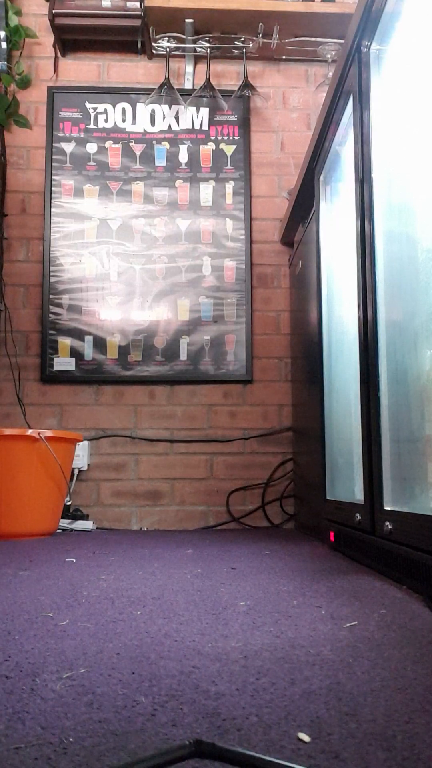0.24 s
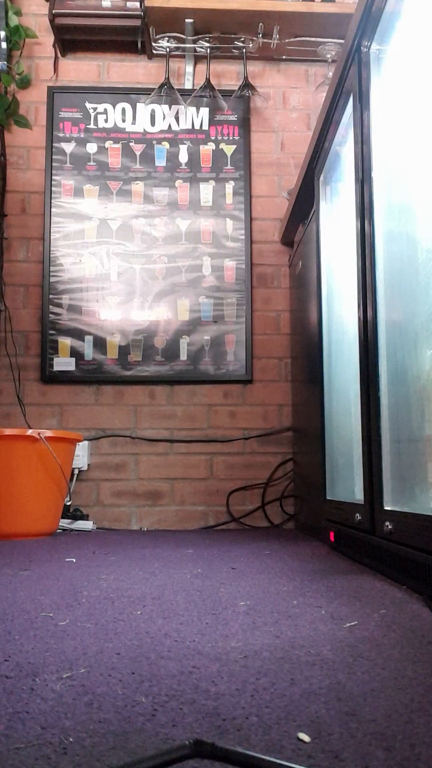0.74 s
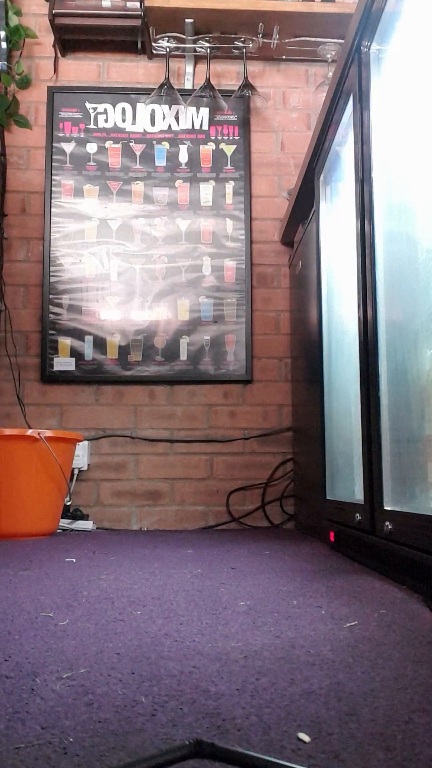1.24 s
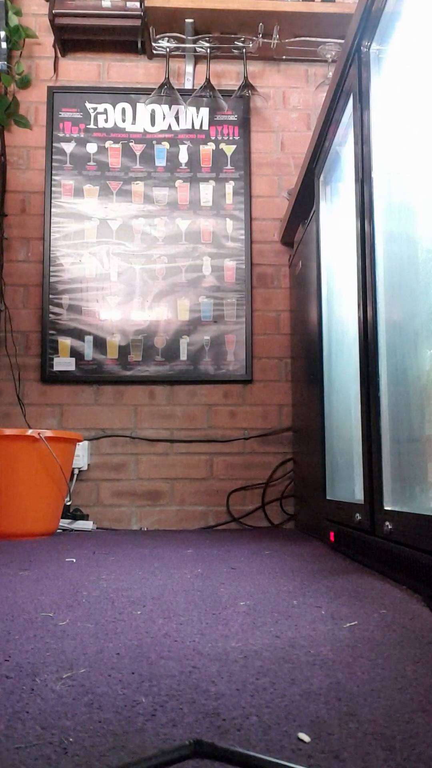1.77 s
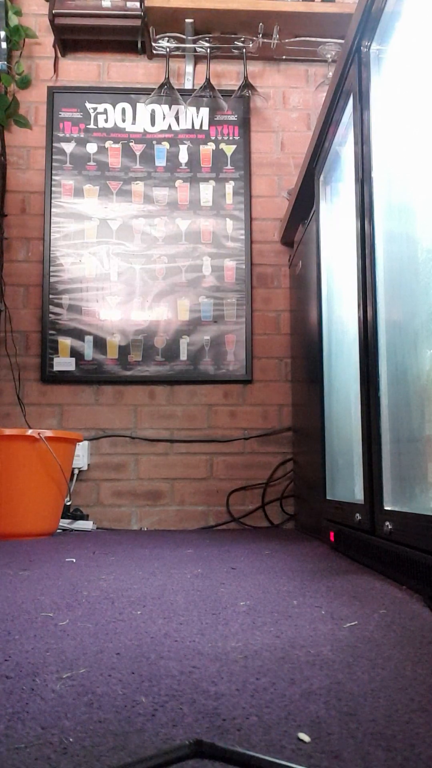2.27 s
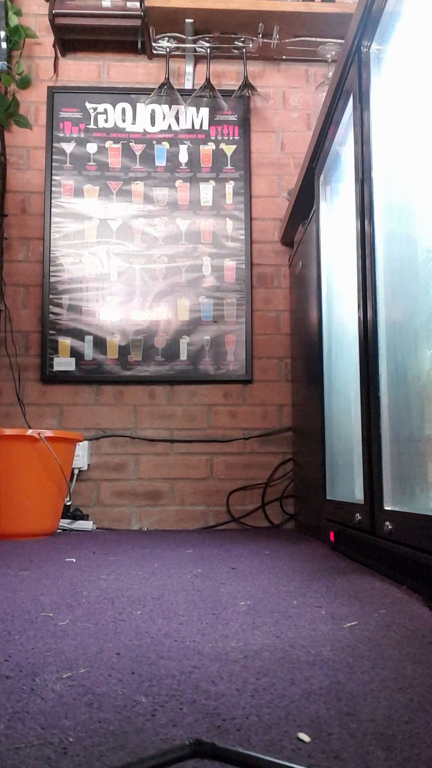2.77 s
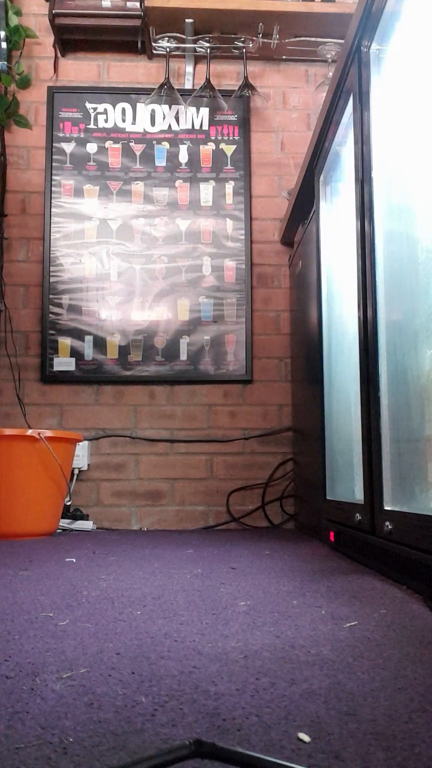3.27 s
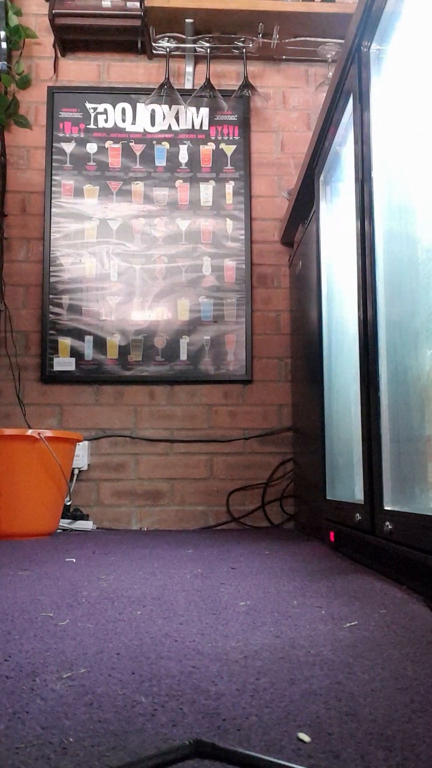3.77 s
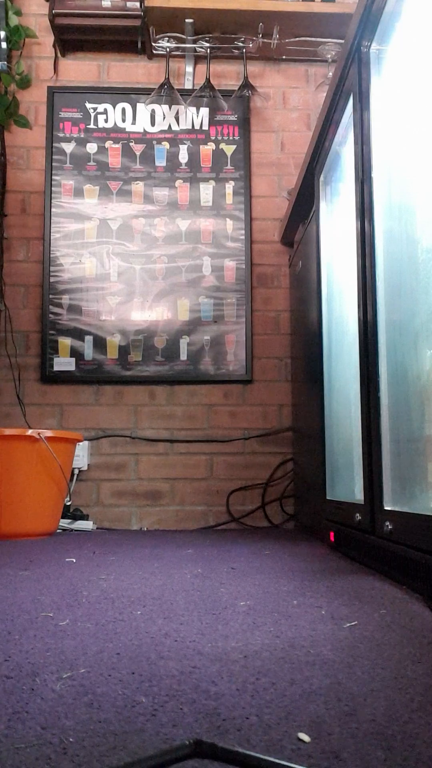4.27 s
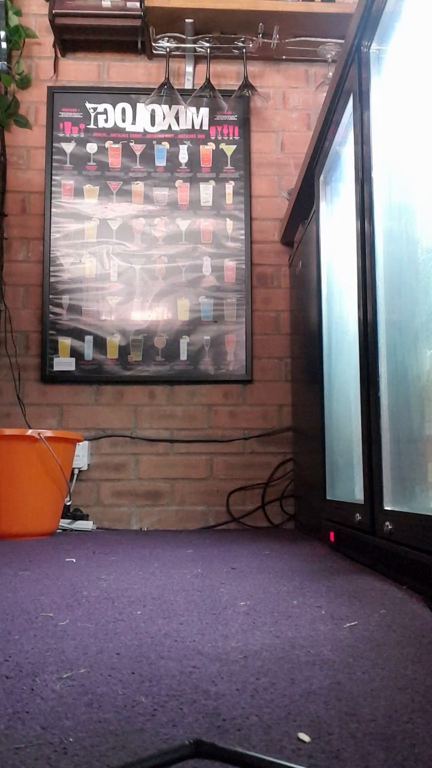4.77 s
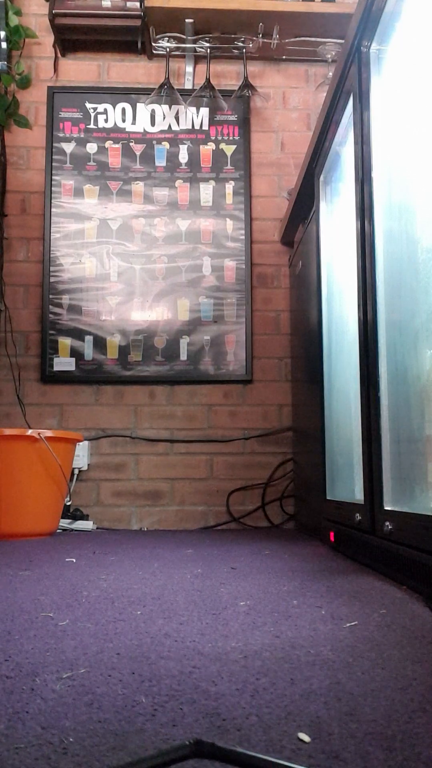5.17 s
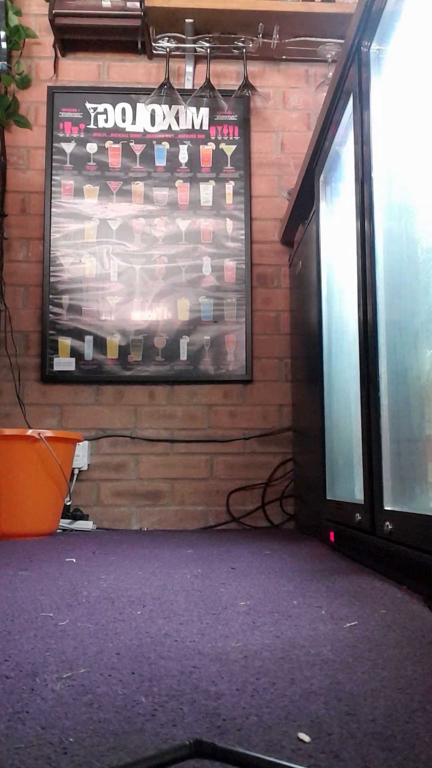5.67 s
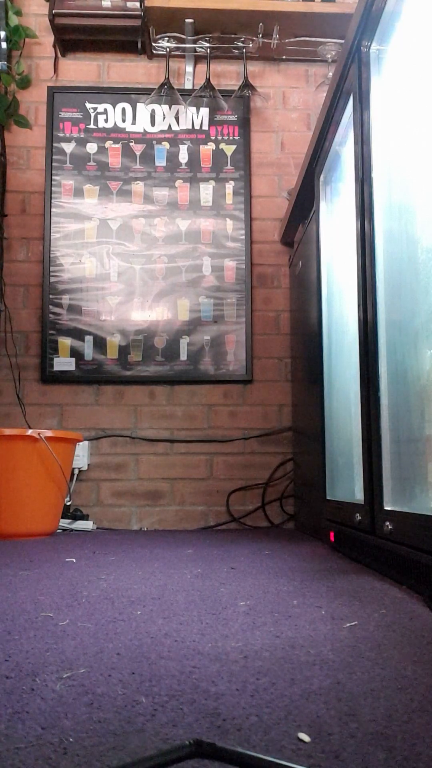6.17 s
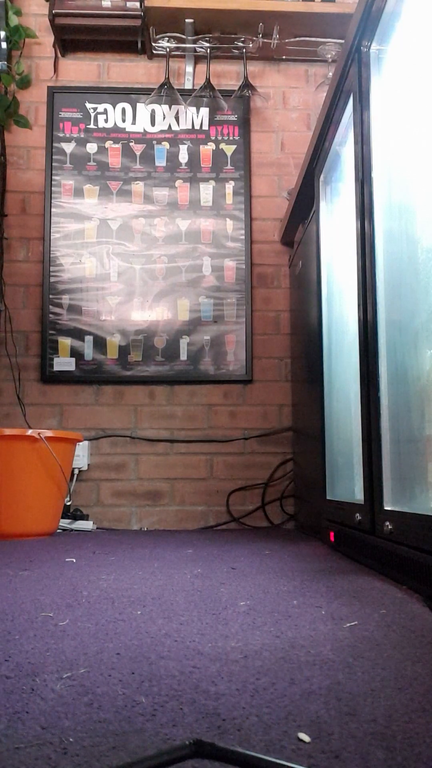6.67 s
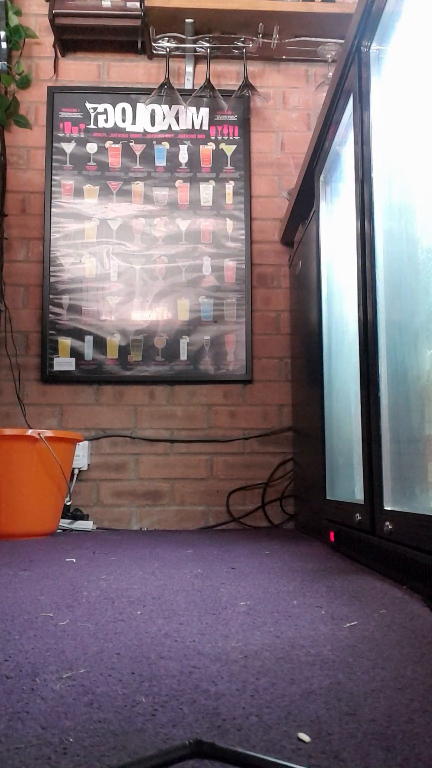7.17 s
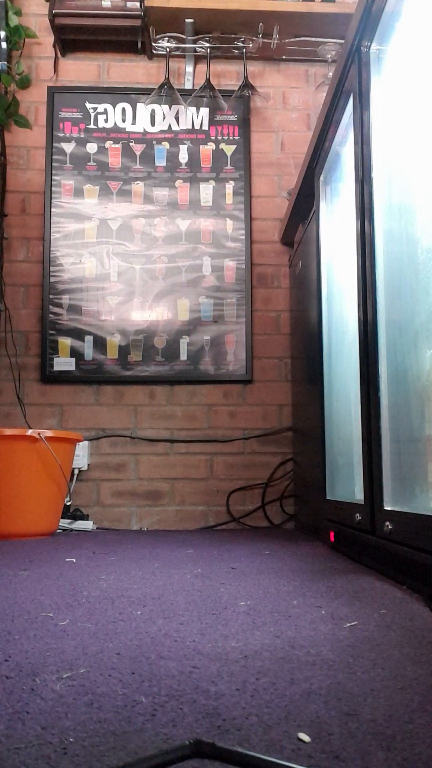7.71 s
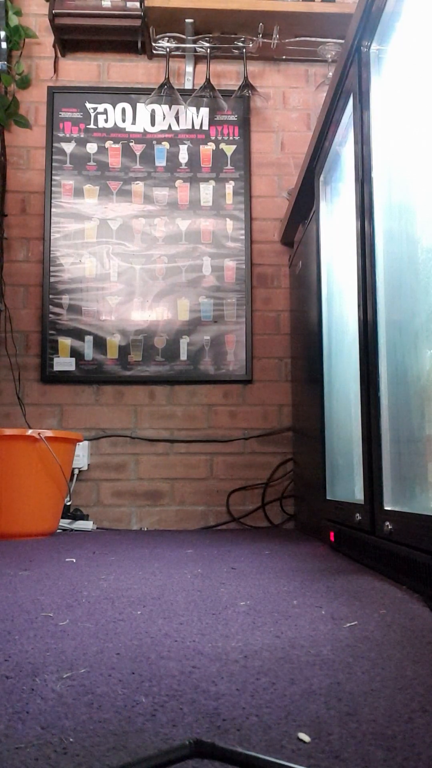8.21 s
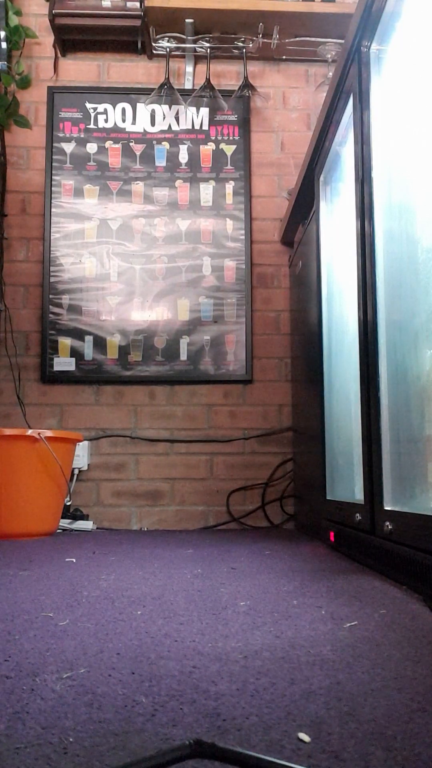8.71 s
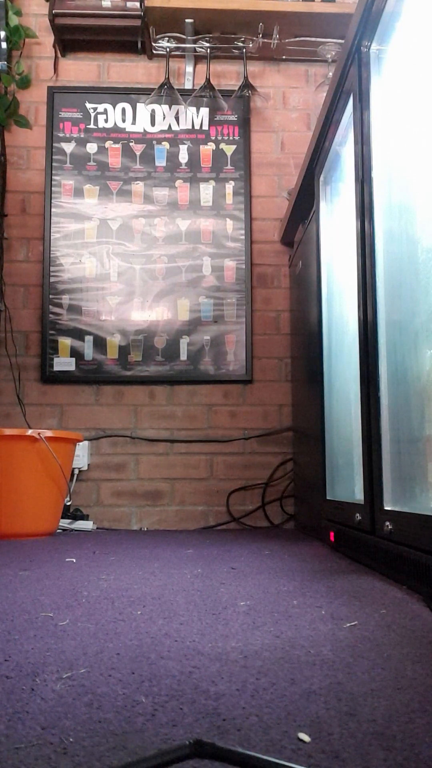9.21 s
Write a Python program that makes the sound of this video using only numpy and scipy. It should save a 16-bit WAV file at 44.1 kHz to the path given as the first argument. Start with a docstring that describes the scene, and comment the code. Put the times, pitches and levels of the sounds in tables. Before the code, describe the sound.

Close stereo phone pickup on a counter beside a running fridge in a small brick-walled bar corner. The constant drone and airy fan carry a light, sputtering hiss. Someone moves about with soft, dull steps and faint cloth rustles. A door then rattles and bangs in several short wooden knocks with metallic latch clicks, shaking the counter with low thumps. Afterwards the fridge continues with occasional muted footfalls.

```python
"""A small bar corner, heard at the two microphone ports of a phone on the counter beside a drinks fridge.
Throughout: motor drone and whine from tones on one shaft, fan air and coolant hiss from shaped noise.
From 0.15 s soft footfalls boom in the floor, and clothes brush in noise swells until about 3.4 s.
From 1.1 s a latch ticks in ringing modes; from 3.3 to 4.9 s a door knocks as rubbing, clicking bursts.
From 4.1 s jolts ring the counter modes; footfalls go on to 8.8 s."""
import sys
import numpy as np
from scipy import signal
from scipy.fft import rfft, irfft
from scipy.io import wavfile
from scipy.ndimage import uniform_filter1d

SR = 44100
rng = np.random.default_rng(int(sys.argv[2]) if len(sys.argv) > 2 else 0)


def inscribe(sig):
    """Save sig as 16-bit PCM at rate SR to the path in sys.argv[1].

    A 1-D sig is mono; a 2-D sig holds one channel per row.
    Samples are clipped to [-1, 1] before scaling.
    """
    pcm = np.round(np.clip(np.atleast_2d(sig).T, -1, 1) * 32767)
    wavfile.write(sys.argv[1], SR, pcm.astype(np.int16))


N = 416744
T = np.arange(N) / SR
HZ = np.maximum(np.arange(N // 2 + 1) * SR / N, 1)

BLADE_HZ, SLOT_HZ, MAINS_HZ = 191.95, 652.7, 50
# motor drone: (multiple of the blade rate, level [dB])
DRONE_PARTIALS = [(1, -55.5), (2, -83), (3, -80), (4, -88), (5, -88.5)]
# rotor-slot whine and magnetic sidebands: (offset [twice the mains rate], level [dB])
WHINE_SIDEBANDS = [(-1, -70.5), (0, -65.5), (1, -70), (2, -91)]
# mains buzz: (multiple of the mains rate, level [dB])
BUZZ_PARTIALS = [(4, -75.5), (6, -76.5)]
# fan air: (frequency [Hz], density [dB per Hz])
AIR_DENSITY = [(20, -110), (38, -93.5), (100, -89.5), (180, -85.5), (230, -91.5), (340, -94.5), (450, -103),
               (620, -94), (760, -99), (950, -104), (1130, -116), (1700, -123), (4000, -135)]
# cabinet resonances stirred by the air: (frequency [Hz], width [Hz], density [dB per Hz])
CABINET_MODES = [(64.5, 4.02, -85.5), (136, 4.7, -72), (373.3, 6.3, -91), (1262, 50, -114)]
# coolant hiss before its flow gain: (frequency [Hz], density [dB per Hz])
HISS_DENSITY = [(1500, -135), (2400, -114), (3400, -117), (5000, -125), (6800, -125), (7800, -138),
                (11000, -126), (15000, -135)]
# pipe resonances before the flow gain: (frequency [Hz], width [Hz], density [dB per Hz])
PIPE_MODES = [(2240, 190, -110), (6140, 213, -123)]
# coolant flow: (time [s], gain [dB])
FLOW_GAIN = [(0, 3.5), (1.5, 1), (3.2, 3), (5, -1), (6, -2), (6.6, 1.5), (7.3, -0.5), (9.4, -0.5)]
# soft footfalls: (time [s], relative level [dB])
FOOTFALLS = [(0.152, -43), (0.491, -55.5), (1.06, -58), (1.85, -54.5), (2.205, -46.5), (3.405, -45),
             (4.842, -41.5), (4.939, -52), (5.46, -43), (6.781, -60), (7.728, -55), (8.78, -58)]
# floor boom: (frequency [Hz], relative gain [dB])
FLOOR_COLOUR = [(20, -28), (42, -9.5), (65, 5), (82, 1.5), (110, -3.5), (170, -15.5), (300, -23.5),
                (700, -73)]
STEP_T60_S = 0.6
# cloth swells: (time [s], level before cloth colour [dB per Hz], half length [s])
CLOTH_SWELLS = [(0.163, -119, .1), (0.538, -116, 0.09), (1.29, -116, 0.13), (1.92, -115, 0.098),
                (3.3, -108, 0.065)]
# cloth colour: (frequency [Hz], gain [dB])
CLOTH_COLOUR = [(500, -4), (1100, 6), (2500, 2), (4000, -6), (6300, 6), (7600, -3), (8500, -37), (11000, 0),
                (15000, -18)]
# latch ticks: (time [s], relative bright ring [dB], relative dull ring [dB], chatter decay [s])
LATCH_TICKS = [(1.127, -50, -58, .003), (1.137, -43, -55, .003), (3.427, -29, -42.5, .01),
               (3.964, -50.5, -61, 0.0016), (3.974, -47, -60, .001), (4.566, -55, -33.5, .025)]
# modes of the latch metal: (frequency [Hz], width [Hz], gain [dB])
DULL_METAL_MODES = [(1950, 900, 0), (2674, 560, 1.5), (3770, 900, -8.5)]
BRIGHT_METAL_MODES = [(5400, 262, -2), (6060, 460, -0.5), (10800, 2700, -15.5)]
# door contacts: (time [s], relative level [dB], rub rise before [s], chatter decay after [s],
# hardness [steps]: 0 firm, below 0 soft)
DOOR_CONTACTS = [(3.315, -39.5, 0.01, 0.05, -0.15), (3.387, -33.5, .002, .024, 0.28),
                 (3.427, -35.5, .004, .012, .3), (3.969, -60.5, 0.00089, .008, -2.6),
                 (4.128, -49.5, 0.0017, 0.018, -0.13), (4.150, -39.5, .004, 0.032, 0),
                 (4.205, -28, .02, .008, -0.7), (4.220, -29, 0.0073, .012, 1), (4.369, -39, .002, 0.026, 0),
                 (4.503, -45, .002, 0.011, -1), (4.522, -41, .004, .04, -1.1),
                 (4.651, -25.5, 0.015, 0.021, 0.1349), (4.86, -61.5, .02, 0.075, -2.5)]
# broad door colour: (frequency [Hz], gain [dB])
DOOR_COLOUR = [(60, -2), (150, 5.5), (330, -0.5), (650, 1), (1300, 4.5), (1950, 2.5), (2400, -2),
               (4000, -3), (6200, -1.5), (7300, -6.5), (8300, -18.5), (11000, -14.5), (13000, -20.5),
               (15500, -35)]
# panel modes once the door sits in its frame: (frequency [Hz], width [Hz], gain [dB])
FRAMED_DOOR_MODES = [(922, 40, 2.5), (1330, 37, -10.5), (1810, 62, 0), (1910, 99, -4.5)]
# effect of one step of hardness: (frequency [Hz], gain [dB])
HARDNESS_COLOUR = [(200, -4.5), (900, -3.5), (2500, 2.5), (7000, 0.5), (10000, 14.5)]
SHUT_S = 4.615
# jolts to the counter: (time [s], level [dB], contact time [s], first rebound against the jolt [dB])
COUNTER_JOLTS = [(4.129, -36.5, 0.0044, -5), (4.202, -25, 0.0019, -19.5), (4.216, -19, 0.0034, 4),
                 (4.699, -37.5, 0.0022, -7)]
# counter modes: (frequency [Hz], gain [dB], t60 [s])
COUNTER_MODES = [(42.3, -6.5, 0.42), (65.2, -8.5, 0.52), (84.9, -6, 0.31), (104, -12.5, 0.25),
                 (114.9, -1.5, 0.39), (138.8, -8, 0.262), (164.6, -2, 0.48), (206, -9.5, .17),
                 (251, -12, 0.21)]
# rocking: first gap, growth ratio of the gaps, loss per rebound, contact time of a rebound
ROCK_GAP_S, ROCK_GROWTH, ROCK_LOSS_DB, ROCK_CONTACT_S = .0283, 1.62, 7.5, .0096
# reverberation: (frequency [Hz], t60 [s])
ROOM_T60 = [(150, 0.82), (700, 0.37), (2000, 0.32), (6000, 0.31), (12000, .27)]
# right port, facing away: (frequency [Hz], gain against the left port [dB])
RIGHT_SHADE = [(50, -1.5), (200, 0.74), (400, 0.5), (650, 4.5), (900, 4), (1500, -3), (2500, -11),
               (4200, -15), (6000, -28), (8300, -43), (10000, -26), (12000, -19.5), (15000, -5.5)]
# lag of sound bending round the phone to the right port: (frequency [Hz], phase [rad])
RIGHT_LAG = [(100, 0.054), (200, 0.17), (400, 0.16), (650, 0.69), (900, 1.58), (1150, 3.25), (1500, 3.08),
             (2000, 4)]
# microphone hiss: (frequency [Hz], density [dB per Hz])
MIC_HISS = [(100, -110), (1400, -117), (2200, -119), (3700, -120), (5500, -125), (7300, -131), (8700, -132),
            (10200, -127), (11500, -120), (15500, -119)]
TOP_HZ = 15600


def undb(db):
    """Decibels to gain."""
    return 10 ** (np.asarray(db) / 20)


def contour(points, hz=HZ):
    """Join (frequency [Hz], value) points on a log-frequency axis."""
    at_hz, value = np.transpose(points)
    return np.interp(np.log(hz), np.log(at_hz), value)


def resonances(modes):
    """Summed response of (frequency [Hz], width [Hz], gain [dB]) resonances."""
    return sum(undb(db) / (1 + 1j * (HZ ** 2 - hz ** 2) / (HZ * width_hz)) for hz, width_hz, db in modes)


def white():
    """Spectrum of white noise at 0 dB per Hz."""
    return rfft(rng.standard_normal(N)) * np.sqrt(SR / 2)


def diffuse(spacing_m=0.11):
    """Spectra of room noise at two close ports: alike in the bass, unrelated in the treble."""
    alike = np.sinc(2 * HZ * spacing_m / 343)  # 343 m/s: speed of sound
    left = white()
    right = alike * left + np.sqrt(1 - alike ** 2) * white()
    return np.array([left, right])


def walk(rate):
    """Smooth random wander with unit spread; a higher rate wanders faster."""
    x = irfft(white() * np.exp(-(HZ / (1 + rate)) ** 2), N)
    return (x - x.mean()) / x.std()


def even(x, span_hz=170):
    """Level a burst's spectrum by its local power, giving it about unit energy."""
    spectrum = rfft(x)
    size = 2 * int(span_hz * len(x) / SR / 2) + 1
    power = uniform_filter1d(abs(spectrum) ** 2, size)
    return irfft(spectrum / np.sqrt(power), len(x))


def tint(x, gain):
    """Colour a short sound by a gain over frequency, without shifting it in time."""
    size = x.shape[-1]
    return irfft(rfft(x) * np.interp(np.fft.rfftfreq(size, 1 / SR), HZ, gain), size)


def add(out, s, x):
    """Mix a short sound in from time s."""
    i = int(s * SR)
    out[..., i:i + x.shape[-1]] += x


def echoes(count, direct_db=-15, early_db=-3, early_s=0.039):
    """Room echoes from several spots: direct click, early boost, tail dying sooner in the treble."""
    field, t = diffuse(spacing_m=0.067), T[:SR]
    bands = []
    for band in range(len(ROOM_T60)):
        share = contour([(hz, k == band) for k, (hz, _) in enumerate(ROOM_T60)])
        bands.append(irfft(field * share, N))
    for start in rng.integers(0, N - SR, count):
        tail = sum(noise[:, start:start + SR] * np.exp(-np.log(1000) * t / t60_s)
                   for noise, (_, t60_s) in zip(bands, ROOM_T60))
        tail = tail * (1 + undb(early_db) * np.exp(-t / early_s))
        yield tail / np.sqrt(np.sum(tail[0] ** 2)) + undb(direct_db) * (t == 0)


def press(contact_s):
    """A smooth push of unit area; a longer one is duller."""
    push = np.sin(np.pi * np.minimum(T[:SR // 20] / contact_s, 1)) ** 2
    return push / push.sum()


def motor(wander=0.0011, waver_db=0.78):
    """Blade drone and slot whine share one shaft speed; mains sidebands make the whine throb."""
    turn = 2 * np.pi * np.cumsum(1 + wander * walk(0.35)) / SR
    mains = 2 * np.pi * MAINS_HZ * T
    drone = sum(undb(db) * np.cos(round(k) * BLADE_HZ * turn + rng.uniform(0, 2 * np.pi))
                for k, db in DRONE_PARTIALS)
    whine = sum(undb(db) * np.cos(SLOT_HZ * turn + 2 * round(k) * mains) for k, db in WHINE_SIDEBANDS)
    buzz = sum(undb(db) * np.cos(round(k) * mains) for k, db in BUZZ_PARTIALS)
    drone = drone * undb(waver_db * walk(2.8))
    whine = whine * undb(waver_db * walk(3))
    return np.sqrt(2) * (drone + whine + buzz)  # levels are RMS


def fan(flutter_db=0.04):
    """Air rushes through the grille and stirs the cabinet panels."""
    colour = np.hypot(undb(contour(AIR_DENSITY)), abs(resonances(CABINET_MODES)))
    return irfft(diffuse() * colour, N) * undb(flutter_db * walk(2.5))


def coolant(sputter_db=2.0):
    """Coolant hisses unevenly through thin, resonant pipes."""
    colour = np.hypot(undb(contour(HISS_DENSITY)), abs(resonances(PIPE_MODES)))
    flow_db = np.interp(T, *np.transpose(FLOW_GAIN))
    return irfft(diffuse() * colour, N) * undb(flow_db + sputter_db * walk(6.7))


def footfalls(settle_s=0.037, gain_db=34):
    """Weight settles on the floor, which booms and dies away."""
    force = np.zeros(N + 2 * SR)  # padded: each burst starts half a second before its step
    t = np.maximum(np.arange(-SR // 2, SR // 2) / SR, 0)
    load = (1 - np.exp(-(t / settle_s) ** 2)) * np.exp(-np.log(1000) * t / STEP_T60_S)
    for s, db in FOOTFALLS:
        add(force, s, undb(db) * even(rng.standard_normal(SR) * load, span_hz=27.1))
    boom = undb(contour(FLOOR_COLOUR))
    boom = boom / np.sqrt(np.mean(boom ** 2))
    return undb(gain_db) * irfft(rfft(force[SR // 2:SR // 2 + N]) * boom, N)


def clothes(crinkle_db=-1.0):
    """Cloth brushes on cloth in short, uneven swells."""
    swell = sum(undb(db) * np.exp(-((T - s) / half_s) ** 2) for s, db, half_s in CLOTH_SWELLS)
    cloth = irfft(diffuse() * undb(contour(CLOTH_COLOUR)), N)
    return cloth * swell * undb(crinkle_db * walk(30))


def ticks(gain_db=35, chatter_db=0, linger_db=-17, linger_s=.035):
    """Small metal latch parts touch, chatter for an instant and ring on in the room."""
    out, half = np.zeros((2, N)), SR // 6
    t = np.arange(-half, half) / SR
    # small parts radiate little outside their modes
    radiated = undb(contour([(1100, -3), (1650, 0.5), (6700, -5.5), (8000, -13.5), (11000, -11.5), (15000, -16)]))
    dull = radiated * abs(resonances(DULL_METAL_MODES))
    bright = radiated * abs(resonances(BRIGHT_METAL_MODES))
    for (s, bright_db, dull_db, chatter_s), echo in zip(LATCH_TICKS, echoes(len(LATCH_TICKS))):
        decay = np.exp(-abs(t) / chatter_s) + undb(linger_db) * np.exp(-abs(t) / linger_s)
        chatter = rng.standard_normal(len(t)) * (t >= 0) * decay
        tap = even((t == 0) + undb(chatter_db) * chatter / np.linalg.norm(chatter), span_hz=400)
        ring = tint(tap, undb(bright_db) * bright + undb(dull_db) * dull)
        add(out, s + t[0], signal.fftconvolve(ring[None], echo))
    return undb(gain_db) * out


def door(gain_db=36, grit_db=6, click_db=-2):
    """Contacts rub in, click and chatter out; hardness tilts the colour; the framed panel rings too."""
    out, half = np.zeros((2, N)), SR // 6
    t = np.arange(-half, half) / SR
    wood, hard_db = undb(contour(DOOR_COLOUR)), contour(HARDNESS_COLOUR)
    framed = abs(wood + resonances(FRAMED_DOOR_MODES))
    for (s, db, rub_s, chatter_s, hardness), echo in zip(DOOR_CONTACTS, echoes(len(DOOR_CONTACTS))):
        noise, grit = rng.standard_normal((2, len(t)))
        envelope = np.exp(-abs(t) / np.where(t < 0, rub_s, chatter_s))
        scrape = noise * undb(grit_db * grit) * envelope
        push = even(undb(click_db) * (t == 0) + scrape / np.linalg.norm(scrape))
        body = framed if s > SHUT_S else wood
        blow = tint(push, body * undb(db + hardness * hard_db))
        add(out, s + t[0], signal.fftconvolve(blow[None], echo))
    return undb(gain_db) * out


def counter(count=4):
    """Jolts push the counter top, which rocks in ever slower, weaker rebounds and rings in low modes."""
    force, t = np.zeros(N), T[:SR]
    for s, db, contact_s, rebound_db in COUNTER_JOLTS:
        add(force, s, undb(db) * press(contact_s))
        for k in range(count):
            s = s + ROCK_GAP_S * ROCK_GROWTH ** k
            add(force, s, undb(db + rebound_db - k * ROCK_LOSS_DB) * press(ROCK_CONTACT_S))
    ring = sum(undb(db) * np.sin(2 * np.pi * hz * t) * np.exp(-np.log(1000) * t / t60_s)
               for hz, db, t60_s in COUNTER_MODES)
    return signal.fftconvolve(force, ring)[:N]


def scene():
    """Fridge, walker, latch, door and counter, summed for the two ports."""
    fridge = motor() + fan() + coolant()
    walker = footfalls() + clothes()
    return fridge + walker + ticks() + door() + counter()


def record(dry, low_hz=27):
    """The right port hears later, with weaker treble; both add hiss; rumble and top are cut."""
    fade = np.minimum(np.minimum(T, T[::-1]) / .005, 1)
    left, right = rfft(dry * fade)
    right = right * undb(contour(RIGHT_SHADE)) * np.exp(-1j * contour(RIGHT_LAG))
    hiss = np.array([white(), white()]) * undb(contour(MIC_HISS))
    sound = irfft(np.array([left, right]) + hiss, N)
    sound = signal.sosfilt(signal.butter(2, low_hz, "highpass", fs=SR, output="sos"), sound)
    return signal.sosfilt(signal.ellip(10, .2, 70, TOP_HZ, fs=SR, output="sos"), sound)


dry = scene()
out = record(dry)
inscribe(out)
```